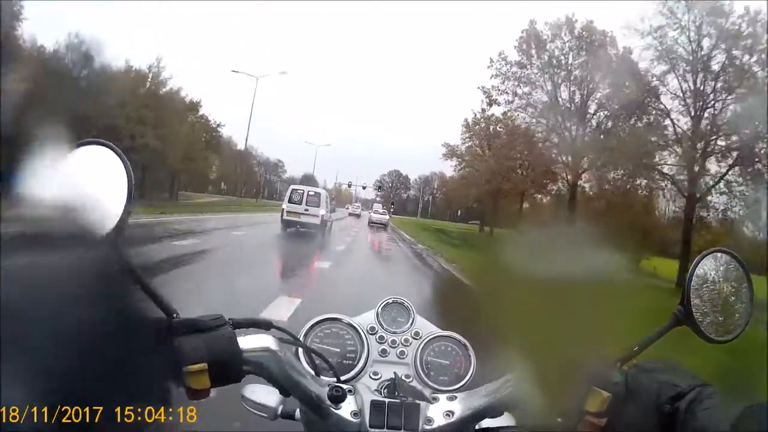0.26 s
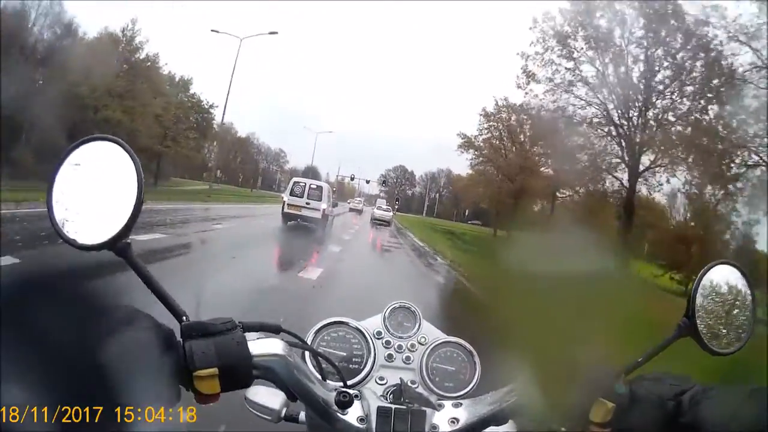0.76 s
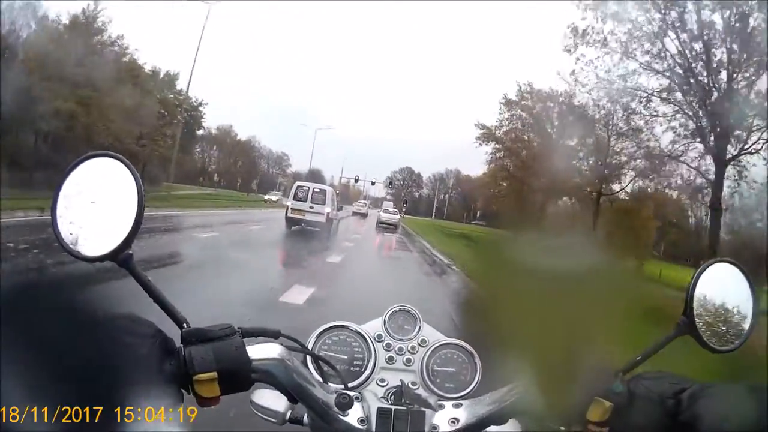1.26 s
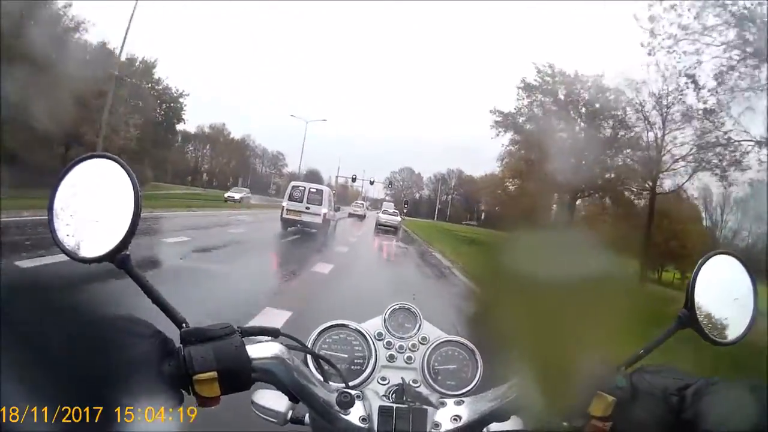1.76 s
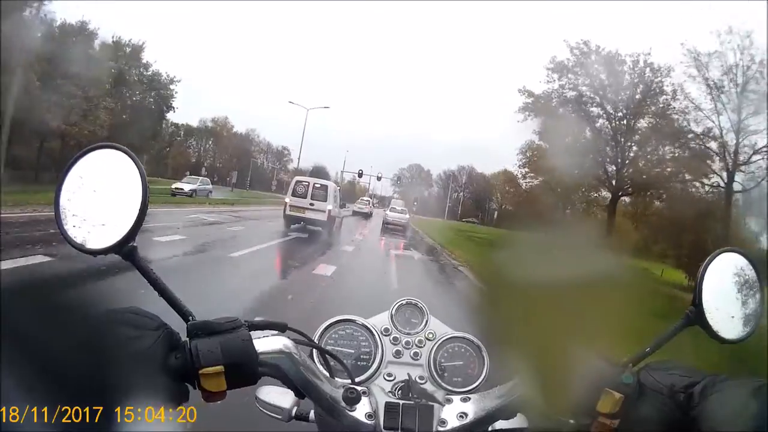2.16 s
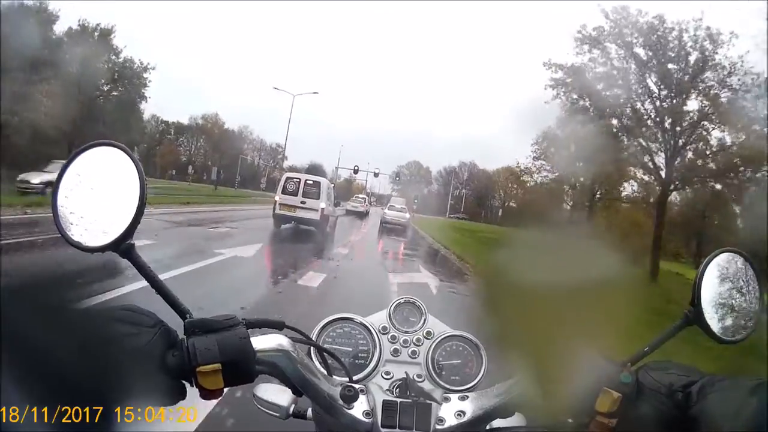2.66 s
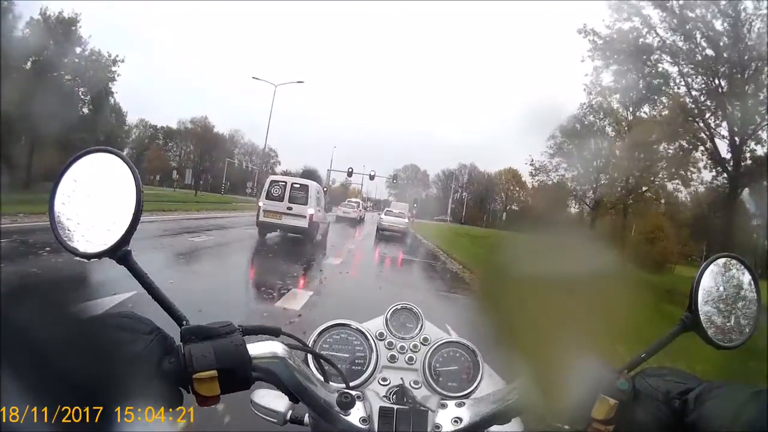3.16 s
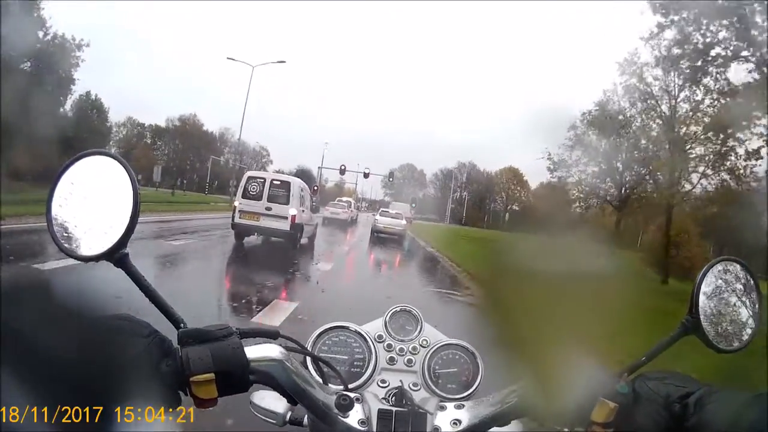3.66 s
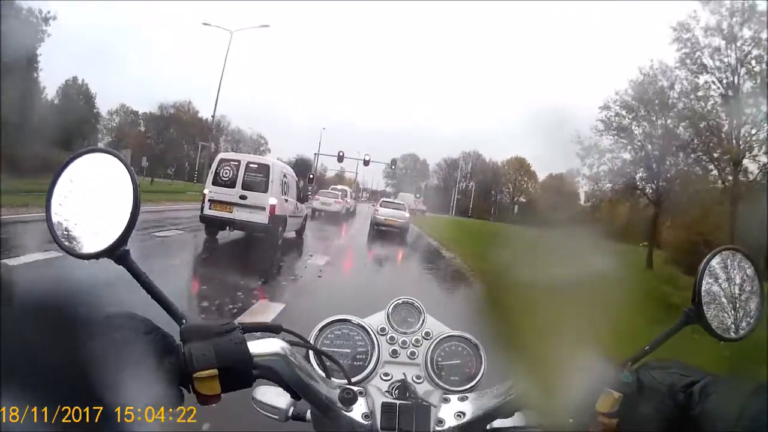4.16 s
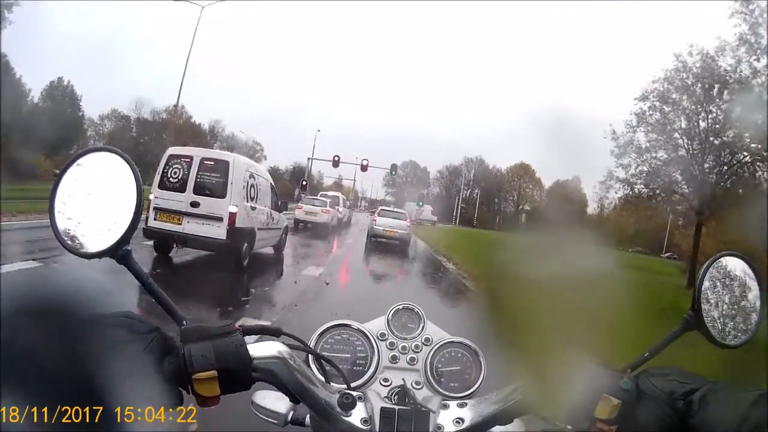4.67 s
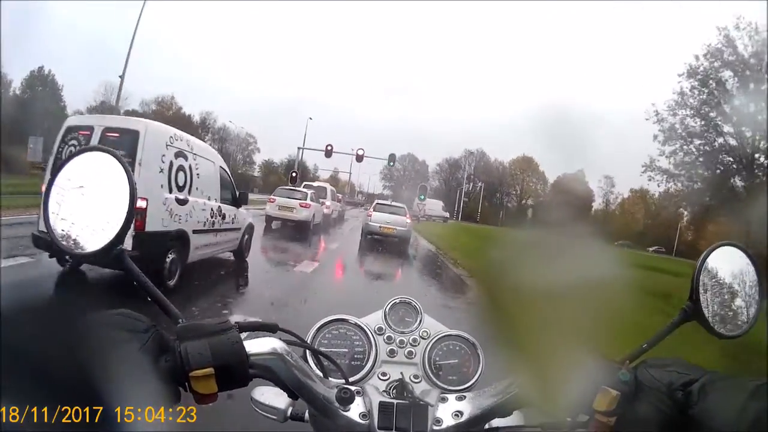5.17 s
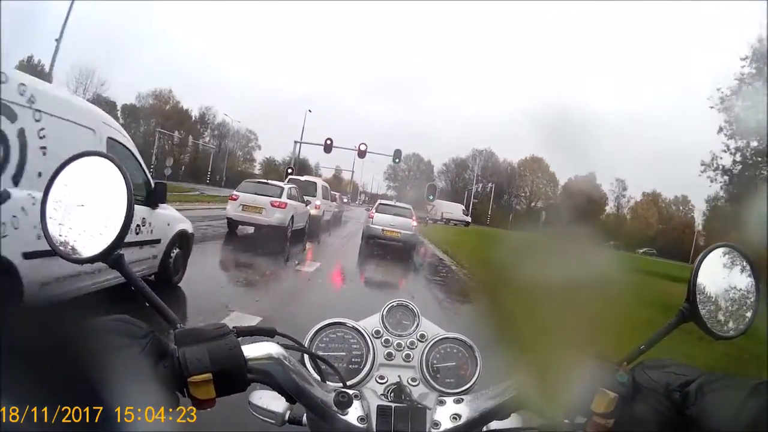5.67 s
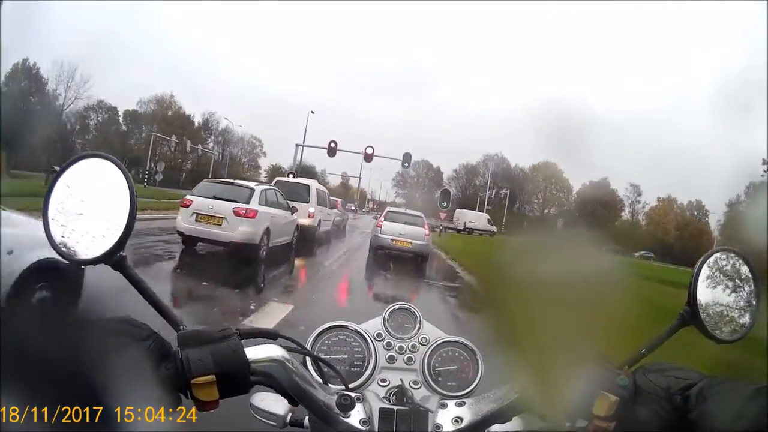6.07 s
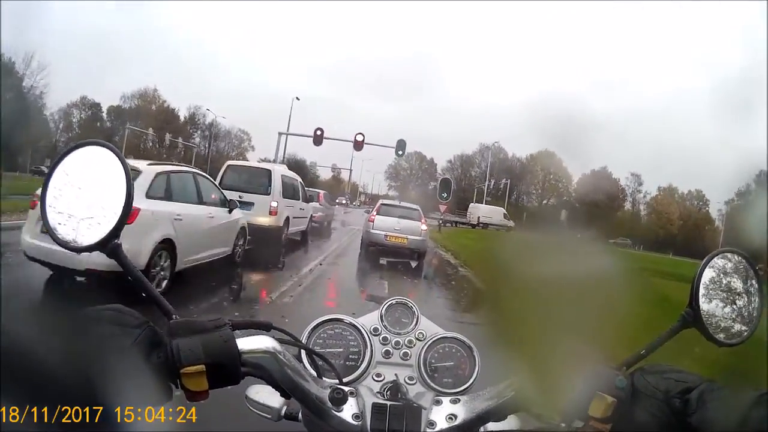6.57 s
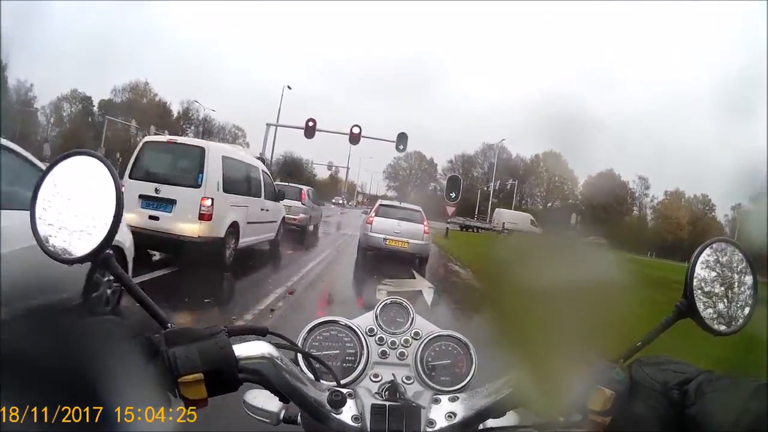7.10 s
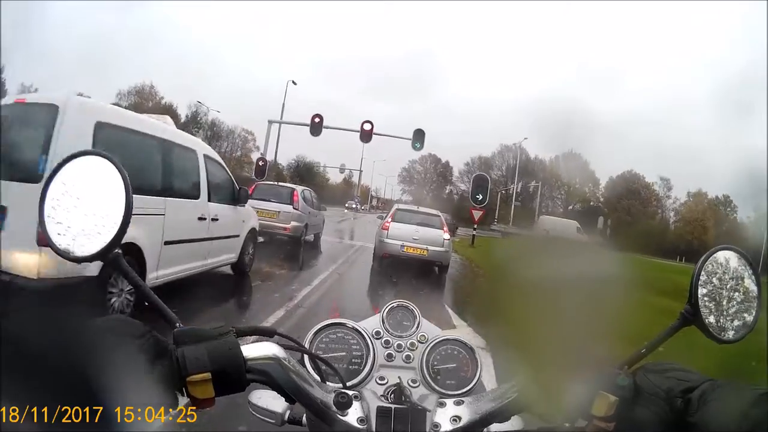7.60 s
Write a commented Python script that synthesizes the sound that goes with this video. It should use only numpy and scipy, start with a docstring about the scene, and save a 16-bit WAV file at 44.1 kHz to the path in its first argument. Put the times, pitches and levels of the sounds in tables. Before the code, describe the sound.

Close inside a small plastic camera housing on a motorcycle in rain, drops strike as short dry ticks and hollow knocks. A midrange rush of wind and spray with low buffeting is strongest at first, then fades unevenly as the bike slows. Taps thin before five seconds, a burst of spray washes over, then scattered taps resume. A faint whine and hiss lie beneath.

```python
"""Rain taps on the plastic housing of a small camera on a motorcycle that slows toward a traffic light.
Each drop is an impulse that rings the modes of shell, mount, lid, edge and cavity. Wind and spray excite the
shell as a rush, strongest at the start and fading unevenly; eddies add a rumble and roar. Taps run from the
very start, with a brief wash of spray at 0.4 s, and thin before 5 s; more sheets wash over and taps resume.
A faint whine (oscillator and octave) swells until 6.5 s; hiss and high tones stay beneath throughout."""
import sys
import numpy as np
from scipy import signal
from scipy.fft import rfft, irfft
from scipy.io import wavfile
from scipy.ndimage import uniform_filter1d

SR = 44100
rng = np.random.default_rng(int(sys.argv[2]) if len(sys.argv) > 2 else 0)


def wav_out(sig):
    """Save sig, one row per channel (or a flat mono array), as 16-bit PCM at SR to the path in sys.argv[1]."""
    wavfile.write(sys.argv[1], SR, np.round(np.clip(np.atleast_2d(sig).T, -1, 1) * 32767).astype(np.int16))


N = 345744
T = np.arange(N) / SR

# Noise spectrum of the electronics, shape only: frequency_hz, density_db
HISS_SPECTRUM = [(300, 1.5), (5000, 0), (9000, -0.5), (14500, 0), (15700, -7.5)]
# Steady tones of the circuit: frequency_hz, mean_level_db (rms)
CIRCUIT_TONES = [(11861.1, -89), (11906.6, -88), (11952.1, -91), (12042, -99)]
# Level of the machine's thin whine: time_s, level_db (rms of the fundamental)
WHINE_LEVEL = [(0, -84), (3.5, -74), (4.9, -71), (6.5, -70), (7.3, -74), (7.84, -80)]
# Air stream, reference levels: time_s, rush_db, buffeting_db
AIR_STREAM = [(0.0, -50.5, -59.5), (0.55, -53, -57), (2.84, -53.5, -59.5), (3.25, -57, -61),
              (4.13, -55.5, -57), (4.37, -58, -61), (6.13, -60.5, -62.5), (6.57, -63, -65),
              (7.49, -62, -62.5), (7.84, -58, -61.5)]
# Noise spectrum of the buffeting, shape only: frequency_hz, density_db
BUFFET_SPECTRUM = [(3, 5.5), (10, 8), (20, 3.5), (45, -3), (100, -5.5), (200, -9), (300, -15.5), (500, -20),
                   (850, -25), (1100, -31), (1600, -90)]
# Upper skirt of the rush, shape only: frequency_hz, density_db
RUSH_SKIRT = [(1900, -2.5), (2170, -6), (2560, -4), (3390, -15.5), (3700, -11.5), (3950, -13.5),
              (4430, -19), (6000, -32), (7000, -50)]
# Sheets of spray that wash over the housing: peak_s, rise_s, fall_s, level_over_rush_db
SPRAY_SHEETS = [(.4, 0.0084, 0.021, 4), (5.08, 0.004, 0.038, 10.5), (5.14, .008, 0.026, 8),
                (5.21, 0.029, 0.042, 6.5)]
# Modes of each part a drop can ring, levels relative within the part: frequency_hz, level_db, t60_s
SHELL_MODES = [(1040, -4.5, 0.029), (1170, -6, 0.015), (1329, 0, 0.0072), (1478, 1.5, 0.014),
               (1666, 1, 0.016), (1880, -2.5, 0.02), (2010, -10.5, 0.01)]
MOUNT_MODES = [(197, -5, 0.021), (276, -3, 0.042), (353, -4.5, 0.029)]
LID_MODES = [(503, -3.5, 0.086), (586, -3, 0.053), (685, 0.5, 0.03), (814, 3, 0.015)]
EDGE_MODES = [(2280, -2, 0.0092), (2606, -3, 0.0076), (2970, -5, 0.0087), (3440, -7, 0.0099)]
CAVITY_MODES = [(3624, -4, 0.012), (3965, 3, 0.014), (4790, -14.5, 0.01)]
SPLASH_MODES = [(5660, 3.5, 0.0094), (7000, 2, 0.0054), (7800, 8, 0.0045), (10070, 8.5, 0.004),
                (12400, -9, 0.0037)]
# Time for a blow to build up, by part: rise_s. A drop flattens first; heavy parts get moving later
BLOW_RISE = {"shell": 0.001694, "mount": 0.003, "lid": 0.00279, "edge": 0.001173, "cavity": 0.00079,
             "splash": 0.000414}
# Big drops, levels as rms of each part's first 10 ms: start_s, shell_db, struck_spot_hz, mount_thud_db,
# lid_knock_db, lid_pitch_hz, edge_click_db, cavity_ring_db
BIG_DROPS = [(.0672, -29, 2040, -43, -36, 740, -27.5, -28.5), (.117, -44, 1750, -65, -53, 664, -57, -70),
             (.2314, -44.5, 1390, -56, -48.5, 700, -63, -78), (.3449, -50, 1620, -60, -64, 650, -51, -48.5),
             (.57, -35, 1730, -41.5, -38.5, 735, -52.5, -62), (.5951, -43, 1540, -56, -70, 650, -55, -64),
             (.622, -50, 1550, -40.5, -54, 610, -73, -79), (.6338, -48, 1400, -62, -64, 670, -63, -73),
             (.6825, -38.5, 1260, -42.5, -45, 620, -56, -66),
             (.7171, -48, 1370, -33.5, -39.5, 670, -81, -78),
             (.8451, -38.5, 1370, -49, -46.5, 584, -86, -79),
             (.8972, -36.5, 1320, -49, -49.5, 610, -47, -56),
             (1.0934, -41.5, 1420, -59, -46.5, 665, -69, -71),
             (1.1659, -47.5, 1510, -59, -54, 604, -64, -77), (1.3623, -26.5, 1620, -53, -45, 800, -53, -63),
             (1.4068, -40, 2000, -55, -49, 670, -38.5, -37), (1.4199, -42, 1470, -51, -61, 480, -56, -68),
             (1.5619, -45, 1390, -62, -55, 610, -74, -78), (1.7604, -47.5, 1640, -65, -61, 660, -57, -66),
             (1.9581, -45, 1380, -54, -54, 610, -75, -62), (1.9717, -40, 1510, -65, -56, 760, -50.5, -62),
             (2.0167, -40, 1440, -55, -52, 695, -46.5, -47.5),
             (2.102, -39.5, 2060, -53, -47.5, 810, -36, -37),
             (2.3499, -47, 1560, -75, -69, 680, -59, -54.5), (2.4887, -38, 1500, -63, -55, 620, -55.5, -61),
             (2.6249, -34.5, 1850, -71, -54, 680, -61, -65), (2.7499, -46, 1660, -63, -55, 700, -48, -56),
             (2.8229, -39, 1610, -58, -60, 657, -59, -73), (2.8752, -37, 1430, -52, -50.5, 705, -63, -76),
             (2.928, -30, 1470, -59, -49, 634, -51, -63),
             (2.9515, -26.5, 1530, -46, -43.5, 790, -42.5, -54.5),
             (3.0033, -30.5, 1290, -42.5, -47.5, 670, -65, -77),
             (3.1109, -46.5, 1580, -70, -57, 510, -49.5, -51),
             (3.3685, -50.5, 1560, -58, -53.5, 693, -51, -61),
             (3.5476, -43, 1460, -47, -48.5, 595, -61.5, -72),
             (3.6151, -46, 1650, -57, -70, 650, -58.5, -62.5), (3.7619, -55, 1390, -47, -57, 580, -78, -79),
             (3.9933, -47.5, 1130, -42.5, -48, 590, -62, -62.5),
             (4.0281, -47.5, 1280, -63, -62, 550, -83, -82), (4.0703, -44.5, 1300, -43, -49, 574, -61, -81),
             (4.0831, -36.5, 1340, -46.5, -45, 655, -46, -46),
             (4.1708, -42.5, 1330, -53, -48, 736, -67, -77), (4.2076, -33.5, 1520, -52, -57, 630, -60, -75),
             (4.3515, -46.5, 1550, -70, -62, 650, -57, -62), (4.3959, -41.5, 1580, -58, -55, 667, -45, -56),
             (4.527, -52, 1550, -66, -63, 650, -58, -65), (4.5827, -48.5, 1740, -58, -53.5, 700, -63, -81),
             (4.6161, -51, 1930, -69, -69, 650, -57.5, -57.5),
             (4.755, -64, 1700, -75, -72, 650, -64, -64.5), (5.454, -44, 1440, -50, -54.5, 660, -55.5, -57),
             (5.5113, -33.5, 1620, -54, -50, 634, -46, -55), (5.5881, -37.5, 1560, -68, -65, 630, -61, -70),
             (5.6031, -51, 1540, -61, -61, 680, -68, -80), (5.6272, -52, 1590, -51.5, -52, 696, -68, -80),
             (5.6575, -47.5, 1360, -56, -55.5, 610, -60.5, -64.5),
             (5.7423, -50.5, 1600, -80, -77, 650, -58, -68), (5.8896, -39, 1510, -57, -54.5, 640, -55, -64),
             (5.9674, -58, 1420, -61, -59, 536, -73, -80), (6.1558, -39, 1540, -50, -49, 710, -59.5, -72),
             (6.2281, -50.5, 1320, -58, -58, 667, -69, -73), (6.3827, -45, 1690, -55, -65, 600, -56, -62),
             (6.3942, -29.5, 1580, -59, -40.5, 570, -41.5, -48),
             (6.787, -59, 1600, -55, -57.5, 740, -81, -84), (6.906, -51, 1520, -76, -80, 650, -74, -81),
             (7.1507, -55.5, 1640, -58, -68, 680, -72, -76), (7.6244, -42, 1320, -48.5, -45, 620, -70, -77),
             (7.677, -53.5, 1400, -62, -64, 650, -79, -82), (7.8106, -46, 1500, -63, -61, 710, -75, -82)]

HISS_DB = -69.5  # rms
WHINE_HZ, WHINE_WOBBLE_HZ = 1302, 3.5  # mean pitch and its standard deviation
ROAR_DB, ROAR_FOLLOWS = -61, 0.71  # roar at a rush of -56 dB; dB of roar per dB of rush
RUSH_SHARPEN = 0.93  # sharpness of the shell modes in the rush, relative to their free ring
LID_WIDTH_HZ = 93  # distance from the struck pitch at which a lid mode is 6 dB down
# A crisp blow (click as loud as the shell) wakes a wide set of shell modes, a dull one a narrow set
CRISP_SPREAD_HZ, SPREAD_HZ_PER_DB, DULL_SPREAD_HZ = 570, 8.5, 180
# Splash relative to the cavity ring; it fades further (dB per dB) as the drop lands away from the port
SPLASH_DB, SPLASH_FADE = -12.5, 0.39
TOP_HZ = 15800


def undb(db):
    """Logarithmic level: every 20 dB is a factor of ten in amplitude."""
    return 10 ** (np.asarray(db) / 20)


def unit(x):
    """Normalization of mean power: scale a signal to rms 1."""
    return x / np.sqrt(np.mean(x ** 2))


def curves(table):
    """Linear interpolation: the columns of a table as continuous functions of time."""
    time_s, *columns = np.transpose(table)
    return [np.interp(T, time_s, column) for column in columns]


def walk(rate_hz):
    """Slow random modulation: levels held for 1 / rate_hz, smoothed twice; mean 0, spread 1."""
    hold = int(SR / rate_hz)
    steps = np.repeat(rng.standard_normal(N // hold + 1), hold)
    smooth = uniform_filter1d(uniform_filter1d(steps, hold), hold)[:N]
    return (smooth - smooth.mean()) / smooth.std()


def coloured(points, lo_hz=1.2, hi_hz=20100.0):
    """Spectral shaping: white noise weighted by a (Hz, dB) curve between two edges."""
    hz, db = np.transpose(points)
    f = np.maximum(np.arange(N // 2 + 1) * SR / N, .1)
    gain = undb(np.interp(np.log(f), np.log(hz), db))
    gain = gain / (1 + (lo_hz / f) ** 8) / (1 + (f / hi_hz) ** 8)
    return irfft(rfft(rng.standard_normal(N)) * gain, N)


def electronics():
    """Stationary noise and line spectra: preamplifier hiss and close tones that waver in level."""
    tones = 0
    for hz, db in CIRCUIT_TONES:
        level = undb(db + 1.5 * walk(5))
        tones = tones + level * np.sin(2 * np.pi * (hz * T + rng.random()))
    hiss = undb(HISS_DB) * unit(coloured(HISS_SPECTRUM, lo_hz=300))
    return hiss + np.sqrt(2) * tones  # rms to peak


def whine():
    """Frequency modulation: a thin tone and its octave share one wandering phase."""
    level_db, = curves(WHINE_LEVEL)
    phase = 2 * np.pi * np.cumsum(WHINE_HZ + WHINE_WOBBLE_HZ * walk(1.5)) / SR
    tone = np.sin(phase) + undb(-15) * np.sin(2 * phase)
    return np.sqrt(2) * undb(level_db + 2.5 * walk(3.84)) * tone


def wind(buffet_db, roar_db):
    """Turbulent excitation: eddies shake the mount as a lumpy rumble with a roar above it."""
    rumble = undb(1.55 * walk(5)) * unit(coloured(BUFFET_SPECTRUM, hi_hz=246))
    roar = undb(1.05 * walk(12)) * unit(coloured(BUFFET_SPECTRUM, lo_hz=223))
    return undb(buffet_db + 5.5) * rumble + undb(roar_db) * roar


def spray_sheets():
    """Transient envelopes in dB: Gaussian washes of spray, broken into clusters of beads."""
    sheets_db = 0
    for peak, rise, fall, db in SPRAY_SHEETS:
        distance = np.where(T < peak, (peak - T) / rise, (T - peak) / fall)
        sheets_db = sheets_db + db * np.exp(-distance ** 2)
    return sheets_db * (1 + 0.14 * walk(160))


def rush(rush_db):
    """Resonance under random forcing: wind and spray shake shell modes that share gusts and flutter alone."""
    body, gust = 0, walk(6)
    for hz, db, t60 in SHELL_MODES:
        peak = signal.iirpeak(hz, hz * t60 * RUSH_SHARPEN / 2.36, SR)
        once = signal.lfilter(*peak, rng.standard_normal(N))
        mode = signal.lfilter(*peak, once)  # the second pass steepens the flanks
        body = body + undb(db + 0.12 * gust + 0.49 * walk(25)) * unit(mode)
    skirt_level = undb(1.2 * gust + 2.4 * walk(30))
    skirt = skirt_level * unit(coloured(RUSH_SKIRT, lo_hz=1910, hi_hz=5950))
    return undb(rush_db + spray_sheets()) * (undb(-0.85) * unit(body) + undb(-12.0) * skirt)


def toward(modes, spot_hz, width_hz):
    """Selective excitation: modes far from the struck pitch are attenuated (dB)."""
    return -6 * ((np.array(modes)[:, 0] - spot_hz) / width_hz) ** 2


def rings(modes, lean_db, rise_s, scatter_db=3.0, turn=1.0):
    """Free decay after a push: modes nearly in step at its peak drift apart; rms 1 over the first 10 ms."""
    hz, db, t60 = np.transpose(modes)
    t = np.arange(SR // 16) / SR
    size, slip = rng.standard_normal((len(lean_db), 2, len(hz))).transpose(1, 0, 2)
    gain = undb(db + lean_db + scatter_db * size) * np.exp(1j * turn * slip)  # slip: phase scatter
    oscillation = np.outer(2j * np.pi * hz, t - rise_s)
    loss = np.outer(np.log(1000) / t60, np.maximum(t - rise_s, 0))
    decay = np.exp(oscillation - loss)
    push = np.sin(np.pi / 2 * np.clip(t / rise_s, 0, 1)) ** 2
    out = (gain.real @ decay.imag + gain.imag @ decay.real) * push
    return out / np.sqrt(np.mean(out[:, :SR // 100] ** 2, axis=1, keepdims=True))


def droplets(rush_db, count=300):
    """Random impacts: small drops at uniform moments, thrown harder by faster air."""
    spot, lid, *chance = rng.standard_normal((count, 6)).T
    start, big = rng.uniform(0, 1, (count, 2)).T
    start_s = start * N / SR
    air_db = rush_db[(start_s * SR).astype(int)]
    size_db = air_db - 5.5 - 2.34 * np.log(1 - .97 * big)  # many faint drops, few strong ones
    part_db = np.array([[-11], [-13], [-15], [-20]])  # mount, lid, edge, cavity relative to the shell
    mount, knock, *upper = size_db + part_db + 5.7 * np.minimum(chance, 1.6)
    return taps(np.transpose([start_s, size_db, 1520 + 130 * spot, mount, knock, 640 + 60 * lid, *upper]))


def taps(table):
    """Modal superposition: the landing spot picks the modes and shares the blow among the parts."""
    columns = np.transpose(table)[:, :, None]
    start_s, shell_db, spot_hz, mount_db, lid_db, lid_hz, edge_db, cavity_db = columns
    even = np.zeros_like(start_s)
    spread_hz = CRISP_SPREAD_HZ + SPREAD_HZ_PER_DB * (edge_db - shell_db)
    spread_hz = np.clip(spread_hz, DULL_SPREAD_HZ, CRISP_SPREAD_HZ)
    splash_db = cavity_db + SPLASH_DB + SPLASH_FADE * np.minimum(cavity_db - edge_db, 0)
    # only a drop near the microphone port makes the cavity sing; others just brush its lower flank
    port_db = np.clip(1.26 * (cavity_db - edge_db), -16, 0) * [0, 1, 1]
    # and such a drop leaves a gap below the cavity's ring
    notch_db = -(12.5 + port_db[:, 1:2]) * [0, 0.47, 1.0, 0.52]
    shell_lean_db = toward(SHELL_MODES, spot_hz, spread_hz)
    lid_lean_db = toward(LID_MODES, lid_hz, LID_WIDTH_HZ)
    sound = (undb(shell_db) * rings(SHELL_MODES, shell_lean_db, BLOW_RISE["shell"])
             + undb(mount_db) * rings(MOUNT_MODES, even, BLOW_RISE["mount"])
             + undb(lid_db) * rings(LID_MODES, lid_lean_db, BLOW_RISE["lid"])
             + undb(edge_db) * rings(EDGE_MODES, notch_db, BLOW_RISE["edge"])
             + undb(cavity_db) * rings(CAVITY_MODES, port_db, BLOW_RISE["cavity"])
             + undb(splash_db) * rings(SPLASH_MODES, even, BLOW_RISE["splash"]))
    out = np.zeros(N + sound.shape[1])
    for start, tap in zip((start_s[:, 0] * SR).astype(int), sound):
        out[start:start + len(tap)] += tap
    return out[:N]


def scene():
    """Linear superposition: electronics, machine, air stream and drops add at one microphone."""
    rush_db, buffet_db = curves(AIR_STREAM)
    roar_db = ROAR_DB + ROAR_FOLLOWS * (rush_db + 56)
    background = electronics() + whine()
    air = wind(buffet_db, roar_db) + rush(rush_db)
    rain = droplets(rush_db) + taps(BIG_DROPS)
    return (background + air + rain)[None]


def record(dry):
    """Band limitation: a steep elliptic low-pass in the recorder cuts the top."""
    lowpass = signal.ellip(10, .2, 60, TOP_HZ, fs=SR, output="sos")
    return signal.sosfilt(lowpass, dry)


dry = scene()
out = record(dry)
wav_out(out)
```